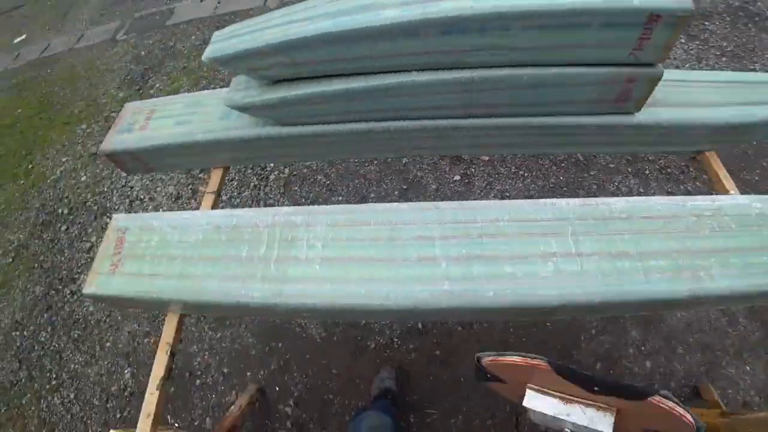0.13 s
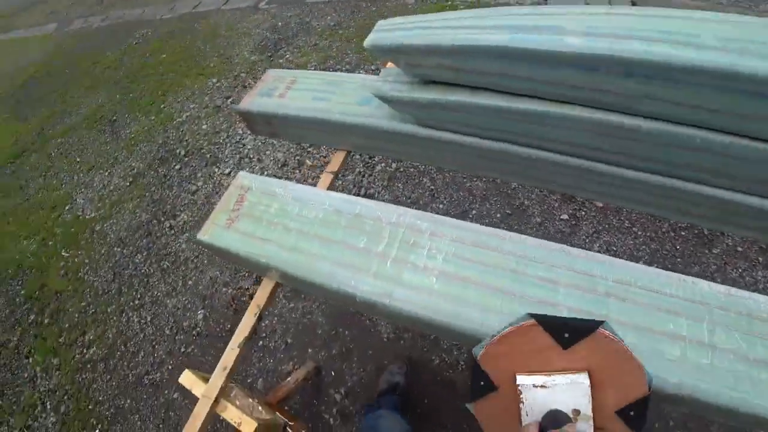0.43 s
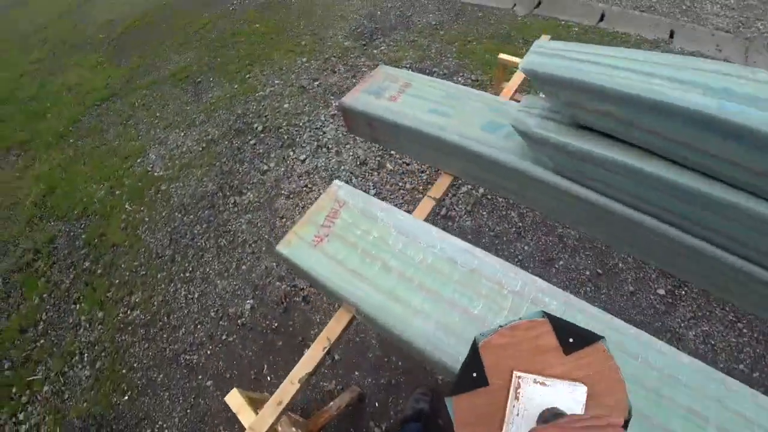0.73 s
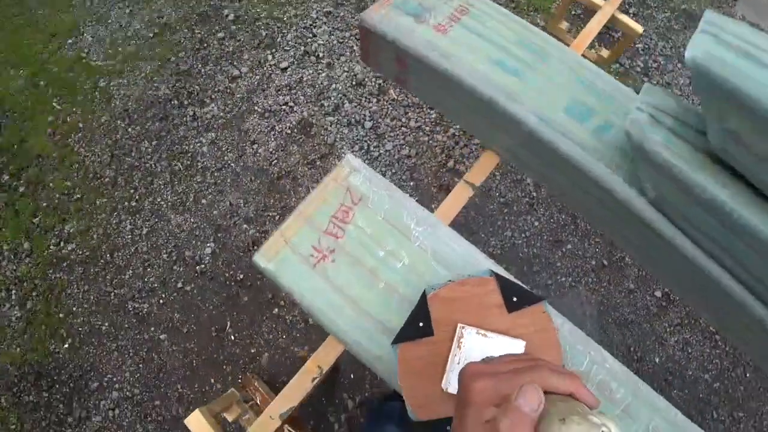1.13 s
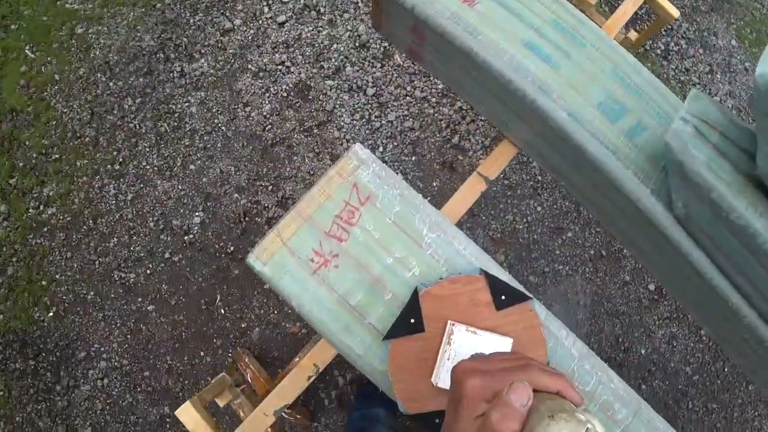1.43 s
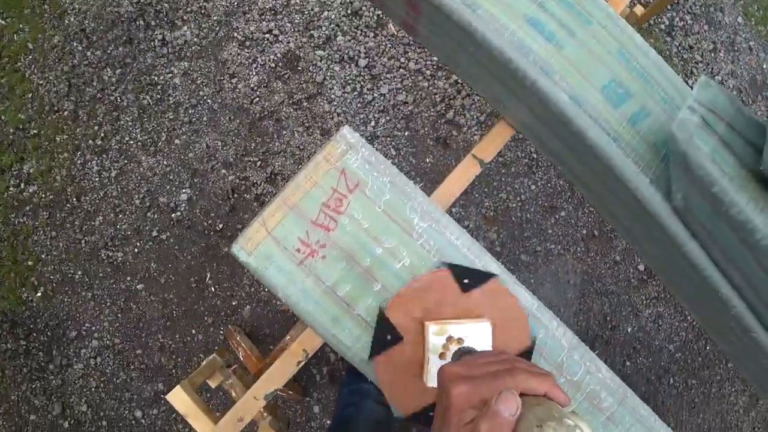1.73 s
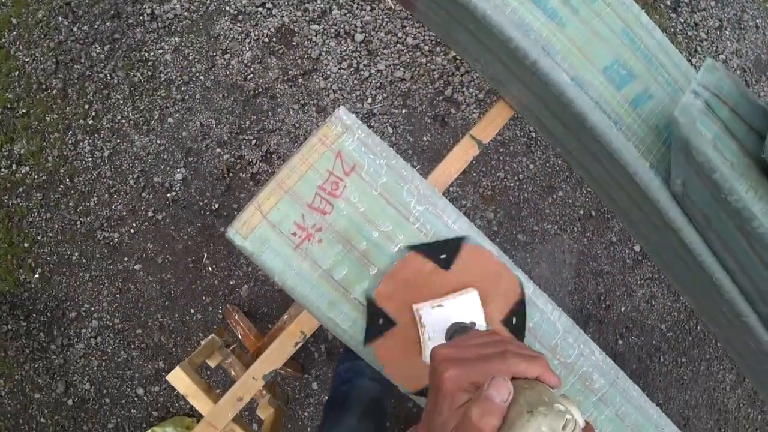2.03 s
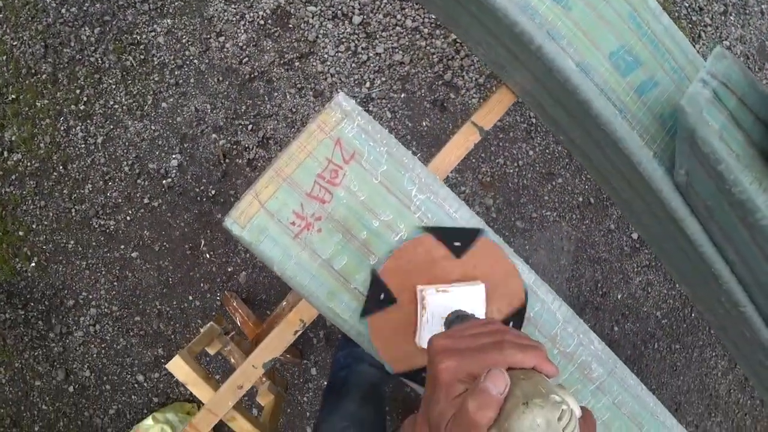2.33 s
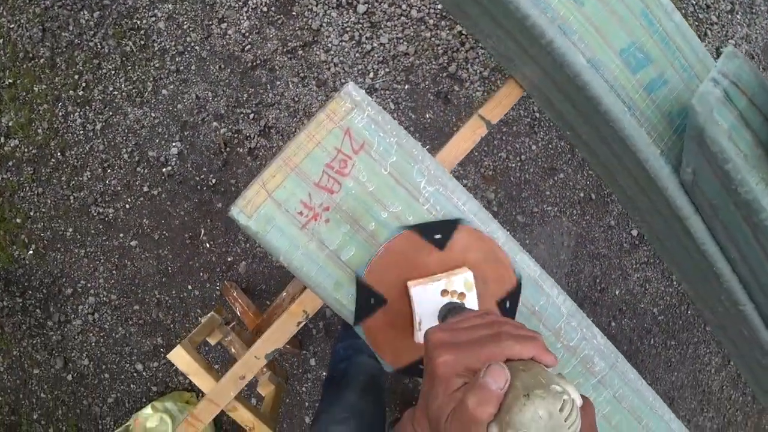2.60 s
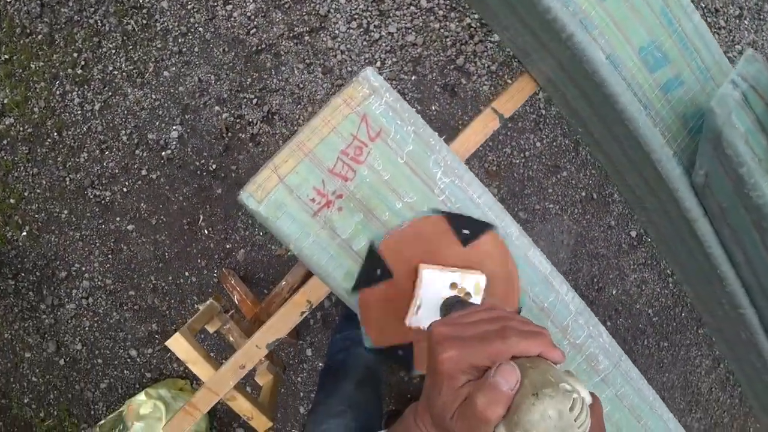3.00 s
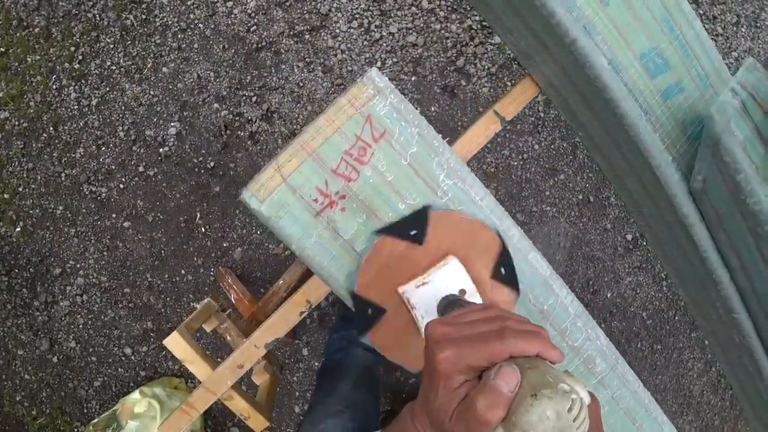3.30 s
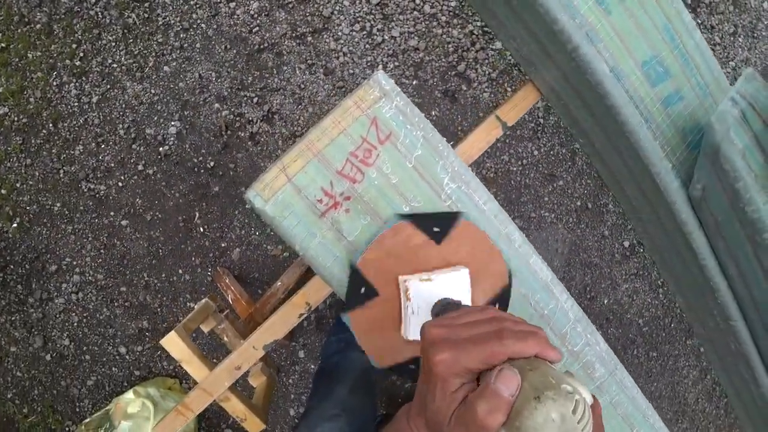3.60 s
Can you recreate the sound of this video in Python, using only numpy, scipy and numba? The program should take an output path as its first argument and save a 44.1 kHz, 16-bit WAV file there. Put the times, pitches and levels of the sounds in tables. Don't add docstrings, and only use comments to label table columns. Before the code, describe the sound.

A drill-driven sander scrapes a hard beam with rough pulsing hiss, following quiet steps on gravel.

```python
import sys
import numpy as np
from scipy import signal
from scipy.fft import rfft, irfft
from scipy.io import wavfile
from scipy.ndimage import uniform_filter1d
from numba import njit

SR = 44100
rng = np.random.default_rng(int(sys.argv[2]) if len(sys.argv) > 2 else 0)


def generate_wav(sig):
    pcm = np.round(np.clip(np.atleast_2d(sig).T, -1, 1) * 32767).astype(np.int16)
    wavfile.write(sys.argv[1], SR, pcm)


def field_ratio(decibels):
    return 10 ** (np.asarray(decibels, dtype=float) / 20)


N = 165375

# pitch_hz, level_db
YARD_COLOUR = [(40, -23), (130, -10.5), (250, 1.5), (700, 6.5), (1700, 4.5), (3000, -4.5), (6000, -25),
               (10800, -28)]
# time_s, level_db
YARD_SWELL = [(0, 4), (.25, 2.5), (.6, 1.5), (.9, 1.5), (1.1, -0.5), (1.35, 1.5), (1.6, 2.5)]
# middle_s, length_s, level_db, pitch_hz
SOLE_DRAGS = [(0.177, 0.026, -52, 4800), (0.415, 0.057, -51.5, 5070), (0.545, 0.024, -56.5, 5100),
              (0.736, 0.056, -53.5, 5000), (0.848, 0.039, -59, 4530), (0.893, 0.016, -44, 2040),
              (1.213, 0.017, -47, 5100), (.845, .01, -47, 2100), (0.758, 0.013, -45.5, 2300),
              (1.478, 0.0057, -38, 1940), (1.601, 0.0066, -44, 2800)]
# pitch_hz, width_hz, level_db, end_s
FAR_SCRAPE = [
    (1110, 30, -41, 0.135),
    (930, 45, -47, 0.13),
    (3060, 45, -55, 0.12),
    (4520, 45, -60, 0.15),
]
# middle_s, length_s, level_db, pitch_hz
WHISTLES = [
    (1.32, .035, -57, 2220),
    (1.14, .04, -61, 2150),
    (.61, .04, -60, 4400),
]
# start_s, peak_db, colour_hz, fade_s (time to fall 60 dB)
CLICKS = [(.034, -45.5, 3500, 0.018), (.166, -53, 5000, .03), (.194, -34.5, 4270, 0.034),
          (.195, -34.5, 2150, .05), (0.297, -41, 3900, 0.026), (.437, -37, 2600, 0.018),
          (.45, -28.5, 2520, 0.04), (.466, -44, 4000, .02), (.560, -43, 4000, .03),
          (.692, -43.5, 5000, .03), (.710, -38, 2300, .03), (.72, -40, 4300, .02), (0.724, -36, 2000, .04),
          (0.742, -39, 2600, 0.06), (.744, -40, 2900, 0.046), (.751, -27, 2000, 0.067),
          (0.759, -32.5, 2040, 0.06), (0.767, -34, 2700, 0.04), (.813, -42, 4600, .02),
          (.819, -41, 2300, .04), (.834, -27.5, 2100, 0.058), (.839, -42, 4200, .02),
          (.845, -31, 1840, 0.065), (.855, -37, 2100, 0.04), (.874, -42, 3500, .05), (.882, -40, 1800, .04),
          (0.887, -42, 3300, 0.025), (.911, -38.5, 1850, .05), (.936, -47, 4000, 0.023),
          (.961, -40.5, 3950, 0.017), (.982, -45, 3480, .02), (1.098, -41, 3300, .03),
          (1.189, -38.5, 6000, .04), (1.234, -45, 7000, .02), (1.258, -36, 3200, 0.025),
          (1.396, -24.5, 2240, 0.076), (1.468, -45, 4000, 0.018), (1.475, -43, 4000, 0.02),
          (1.492, -43, 6950, 0.014), (1.534, -29, 4070, 0.038), (1.535, -33, 1900, .05),
          (1.588, -15.5, 3030, 0.032), (1.618, -13.5, 2300, 0.061), (1.558, -48, 6000, .02)]
# start_s, peak_db, fade_s (time to fall 60 dB)
THUDS = [
    (1.398, -26.5, .09),
    (1.05, -43, 0.046),
    (1.619, -23, 0.094),
    (1.3, -36, 0.035),
]
# pitch_hz, width_hz, level_db
BEAM_NOTES = [
    (350, 37, -15),
    (550, 206, -2.5),
    (768, 88, -2),
    (936, 330, -2),
]
# pitch_hz, level_db
GRIT_COLOUR = [(250, -53), (700, -15), (1350, -3), (1750, 5), (3500, 0.5), (7500, -1), (8400, -7),
               (10900, -8)]
# time_s, level_db
PRESSURE = [
    (1.615, -40),
    (1.632, -21.5),
    (1.655, -13),
    (1.72, -15.5),
    (1.78, -14.5),
    (2.3, -14.5),
    (2.8, -15.5),
    (3.3, -15),
    (3.55, -15.5),
    (3.75, -14.5),
]
# pitch_hz, width_hz, level_db
RINGS = [
    (1850, 37, -10.5),
    (2730, 320, -13.5),
    (6100, 940, -17),
    (2300, 300, -14),
]
# time_s, thud_level_db
WOBBLE = [
    (1.62, -21),
    (2.0, -28),
    (2.5, -27.5),
    (3.0, -31.5),
    (3.75, -34),
]
# landing_s, depth_db, length_s
SKIPS = [(2.327, 2.5, 0.028), (2.66, 2.5, 0.0058), (2.839, 5.5, 0.014), (3.241, 3.5, 0.013),
         (3.338, 12, 0.017), (3.442, 7.5, 0.013), (3.443, 4.5, 0.018), (3.486, 2.5, 0.0074),
         (3.548, 11, 0.028), (3.583, 4.5, 0.012), (3.65, 7.5, 0.015), (3.657, 5, 0.04), (3.708, 6.5, 0.013),
         (3.76, 8.5, 0.035)]
# middle_s, level_db, pitch_hz (the beam's answer)
KNOCKS = [(1.685, -22, 350), (1.685, -19, 750), (1.77, -25, 550), (1.91, -16.5, 760), (2.028, -30, 350),
          (2.13, -29, 350), (2.225, -21.5, 760), (2.29, -22.5, 760), (2.379, -24, 561), (2.51, -28.5, 519),
          (2.61, -22, 850), (2.71, -26.5, 550), (2.93, -29.5, 398), (3.0, -25, 560.5), (3.201, -30.5, 550),
          (3.302, -30, 555), (3.404, -18, 1160), (3.51, -21, 1170), (3.555, -23.5, 1070), (3.31, -25, 1000),
          (2.804, -20, 1206), (1.685, -19, 522), (1.86, -28, 479), (2.12, -21.5, 760), (2.165, -25, 780),
          (2.465, -25, 800), (2.535, -25, 700), (2.67, -29, 531), (2.905, -24, 770), (2.78, -35, 420)]
# middle_s, length_s, level_db, pitch_hz
CHIMES = [(1.688, .012, -17, 1870), (1.8, .012, -21, 1930), (1.86, .018, -16, 1790),
          (1.94, .018, -19, 1950), (2.082, .015, -16, 1775), (2.168, .018, -16, 1830),
          (2.27, .016, -17, 1865), (2.37, .018, -20, 1860), (2.45, .018, -19.5, 1880),
          (2.55, .02, -17, 1830), (2.61, .012, -20, 1820), (2.75, .015, -17, 1820),
          (2.865, .013, -17, 1820), (2.96, .02, -18, 1850), (3.05, .022, -18.5, 1850),
          (3.15, .02, -18.5, 1890), (3.22, .014, -18.5, 1890), (3.318, .011, -19, 1880),
          (3.4, .017, -20, 1840), (3.495, .012, -19, 1770), (3.557, .007, -18, 1730),
          (3.595, .014, -17, 1810), (3.63, .01, -19, 1850), (3.695, .008, -18, 1780),
          (3.71, .008, -18, 1870)]
# middle_s, length_s, level_db, pitch_hz
SQUEALS = [
    (2.771, 0.0066, -22, 2740),
    (2.98, 0.014, -26, 2750),
    (3.257, 0.013, -19, 2836),
    (3.363, 0.0086, -16, 2856),
    (3.388, 0.011, -17, 2760),
    (3.459, 0.0071, -18.5, 2837),
    (3.494, 0.0084, -15, 2710),
    (3.57, 0.0066, -13.5, 2795),
    (3.597, 0.012, -21.5, 2713),
    (3.672, 0.0061, -20.5, 2860),
]
# pitch_share, level_db
STRANDS = [
    (1, 2.5),
    (1.055, -3),
    (.93, -6),
]
# pitch_hz, gain_db, lead_rad, unrelated_share_db
LEFT_PORT = [(110, -5, .5, -2), (340, -8.5, .05, -14), (580, -19, .95, -22), (720, -13, 2.15, -23),
             (1150, -7.7, 2.5, -18), (2000, -5.9, 2.4, -17), (5200, -5.3, 1.75, -13),
             (11000, -6.8, .75, -9)]

OCTAVE_DB, RAGGED_DB = -11, 1.8
TURN_S, TURN_HZ = 3.4, 9.95


def times():
    return np.arange(N) / SR


def unit(x):
    return x / np.sqrt(np.mean(x ** 2))


def noise():
    return rng.standard_normal((2, N))


def grains(rough_db):
    return unit(noise() * field_ratio(rough_db * rng.exponential(size=(2, N))))


def on_log(table, col):
    table = np.array(table, float)
    return np.interp(np.log(np.fft.rfftfreq(N, 1 / SR) + 1), np.log(table[:, 0]), table[:, col])


def colour(x, table):
    return unit(irfft(rfft(x) * field_ratio(on_log(table, 1)), N))


@njit
def svf(x, g, k):
    y = np.empty_like(x)
    for c in range(len(x)):
        b, l = 0., 0.
        for i in range(x.shape[1]):
            v = (b + g[i] * (x[c, i] - l)) / (1 + g[i] * (g[i] + k[i]))
            b, l, y[c, i] = 2 * v - b, l + 2 * g[i] * v, k[i] * v
    return y


def ring(x, hz, width):
    hz = np.clip(hz + np.zeros(x.shape[1]), 50, 15000.)
    return svf(x, np.tan(np.pi * hz / SR), width / hz)


def walk(rate):
    k = int(SR / rate)
    held = np.repeat(rng.standard_normal(N // k + 1), k)
    return 1.19 * uniform_filter1d(uniform_filter1d(held, k), k)[:N]


def bump(at, length):
    return np.exp(-.5 * ((times() - at) / length) ** 2)


def rise(at, length):
    return .5 + .5 * np.tanh((times() - at) / length)


def tone(at, length, hz, fall_hz_s, waver):
    out, tau = np.zeros((2, N)), np.arange(-3000, 3000) / SR
    drift = uniform_filter1d(rng.standard_normal((2, len(tau))), size=64) * 8
    pitch = (hz - fall_hz_s * tau) * (1 + waver * drift[0])
    phase = 2 * np.pi * (np.cumsum(pitch) / SR + rng.random((2, 1)))
    wave = np.sin(phase) + field_ratio(OCTAVE_DB) * np.sin(2 * phase)
    wave = wave * np.exp(-.5 * (tau / length) ** 2) * field_ratio(RAGGED_DB * drift[1])
    part = out[:, int(at * SR) - 3000:][:, :len(tau)]
    part += wave[:, :part.shape[1]]
    return out


def patchy(x):
    spectrum, place = rfft(x), np.clip(np.fft.rfftfreq(N, 1 / SR) / 400, 0, 28)
    out = 0
    for k in range(29):
        band = irfft(spectrum * np.clip(1 - abs(place - k), 0, 1), N)
        out = out + field_ratio(1.8 * walk(45)) * band
    return out


def yard_hum():
    swell_db = np.interp(times(), *np.array(YARD_SWELL).T)
    level = field_ratio(-46.5 + swell_db + 0.63 * walk(2.6) + 0.37 * walk(36.3))
    return level * (colour(noise(), YARD_COLOUR) + field_ratio(-6.5) * unit(ring(noise(), 860, 200)))


def dragging_soles():
    crunch = grains(rough_db=2.2) * field_ratio(1.25 * walk(110))
    return sum(field_ratio(db) * bump(at, s) * unit(ring(crunch, hz, 0.19 * hz * hz / 2000))
               for at, s, db, hz in SOLE_DRAGS)


def far_scrape():
    t, out = times(), 0
    for hz, width, db, end in FAR_SCRAPE:
        from_top = np.clip(t - 0.061, -1, .12)
        sag = 6.7 * np.clip(1000 / hz, 0, 1) ** 2 * from_top ** 2
        level = field_ratio(db + 1.8 * walk(20)) / (1 + (t / end) ** 6)
        out = out + level * unit(ring(noise(), hz * (1 - sag), width))
    return out


def wind():
    return field_ratio(-61 + 7.0) * bump(1, 0.079) * unit(ring(noise(), 162, 100))


def whistle():
    return sum(field_ratio(db) * tone(at, s, hz, 300, .006) for at, s, db, hz in WHISTLES)


def crunches_and_clicks():
    out, tau = np.zeros((2, N)), np.arange(6000) / SR
    for at, db, hz, t60 in CLICKS:
        fade = np.exp(-np.log(1000) * tau / (0.18 * t60)) + 0.25 * np.exp(-np.log(1000) * tau / t60)
        raw = rng.standard_normal((2, len(tau))) * fade
        body = ring(ring(raw, hz, 900 * (hz / 2200) ** 2.9), hz, 0.94 * hz * hz / 2200)
        burst = 1.4 * body + field_ratio(-36 + 5.0 * np.log2(hz / 2500)) * raw
        out[:, int(at * SR):][:, :len(tau)] += field_ratio(db + 5.0) * burst / abs(burst[0]).max()
    return out


def thuds():
    out, tau = np.zeros((2, N)), np.arange(6000) / SR
    for at, db, t60 in THUDS:
        raw = rng.standard_normal((2, len(tau))) * np.exp(-np.log(1000) * tau / t60)
        body = sum(field_ratio(g) * ring(ring(raw, hz, 1.3 * w), hz, 3.5 * w) for hz, w, g in BEAM_NOTES)
        out[:, int(at * SR):][:, :len(tau)] += field_ratio(db + 13) * body
    return out


def hand_shake():
    level = field_ratio(-73.5 + 2.7 * walk(10)) * rise(1.65, .02)
    return level * unit(ring(ring(noise(), 40, 50), 40, 80))


def beam_rumble():
    beam = sum(field_ratio(db + 2.8 * walk(24.8)) * unit(ring(ring(noise(), hz, w), hz, 1.9 * w))
               for hz, w, db in BEAM_NOTES)
    flutter_db = 2.15 * walk(45.35)
    turn_db = 1.66 * np.cos(2 * np.pi * TURN_HZ * (times() - TURN_S) + 0.2 * walk(5.0))
    wobble_db = np.interp(times(), *np.array(WOBBLE).T) + 8.5
    return beam * field_ratio(flutter_db + turn_db + wobble_db)


def rim_knocks():
    return sum(field_ratio(db + .5) * tone(at, .0045, hz, 319, 0.086) for at, db, hz in KNOCKS)


def squeals():
    return sum(field_ratio(db + strand_db) * tone(at, s, hz * share, 3000, .007)
               for at, s, db, hz in SQUEALS for share, strand_db in STRANDS)


def chimes():
    return sum(field_ratio(db) * tone(at, s, hz, -900, .005) for at, s, db, hz in CHIMES)


def disc_rings():
    return sum(field_ratio(db + 0.58 * walk(18)) * unit(ring(noise(), hz * (1 + 0.008 * walk(8)), w))
               for hz, w, db in RINGS)


def grit_hiss():
    return patchy(colour(grains(1.0), GRIT_COLOUR)) * field_ratio(0.16 * walk(30.1) + 1.39 * walk(90))


def disc_grip():
    lift_s, land_s = 0.0093, 0.0011
    return field_ratio(-sum(db * rise(at - s, lift_s) * (1 - rise(at, land_s)) for at, db, s in SKIPS))


def sanding():
    t, grip = times(), disc_grip()
    press = field_ratio(np.interp(t, *np.array(PRESSURE).T)) * (t > PRESSURE[0][0])
    hiss = grip * grit_hiss()
    body = grip ** 0.5 * (disc_rings() * rise(1.61, 0.1) + beam_rumble())
    tool = press * (hiss + body) + rim_knocks() + squeals() + chimes()
    return signal.sosfilt(signal.butter(3, 230, "high", fs=SR, output="sos"), tool)


def scene():
    tool = sanding() + hand_shake()
    strikes = crunches_and_clicks() + thuds()
    yard = yard_hum() + dragging_soles() + far_scrape() + wind() + whistle()
    shared, own = tool + strikes + yard
    turned = field_ratio(on_log(LEFT_PORT, 1)) * np.exp(1j * on_log(LEFT_PORT, 2))
    left = rfft(shared) * turned + rfft(own) * field_ratio(on_log(LEFT_PORT, 3))
    return np.array([irfft(left, N), shared])


def low_pass(x):
    return signal.sosfilt(signal.butter(12, 12220, fs=SR, output="sos"), x)


def record(dry):
    soft = dry / (1 + (dry / .85) ** 6) ** (1 / 6)
    soft = signal.sosfilt(signal.butter(2, 25, "high", fs=SR, output="sos"), soft)
    cut = signal.sosfilt(signal.ellip(12, .3, 52, 11010, fs=SR, output="sos"), soft)
    return low_pass(cut)


dry = scene()
out = record(dry)
generate_wav(out)
```